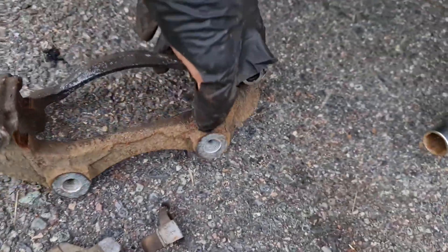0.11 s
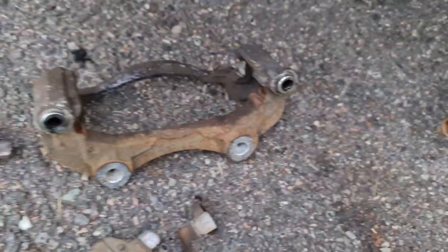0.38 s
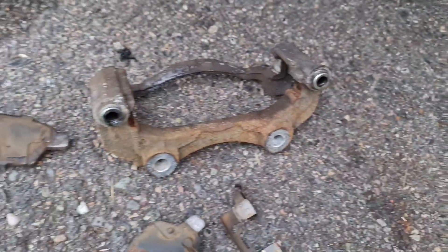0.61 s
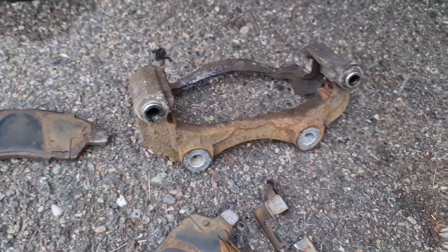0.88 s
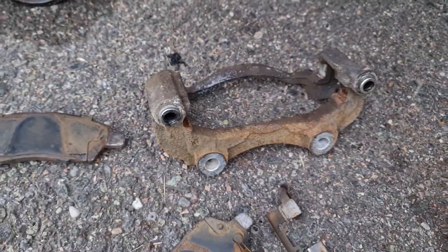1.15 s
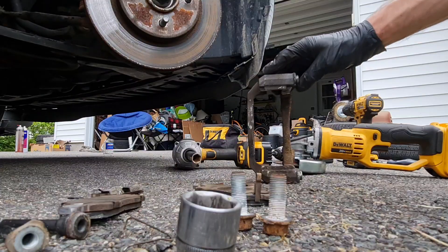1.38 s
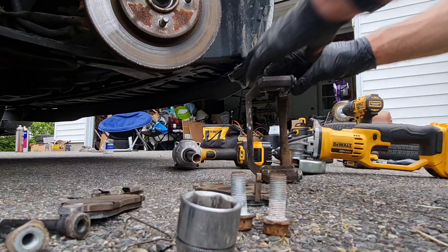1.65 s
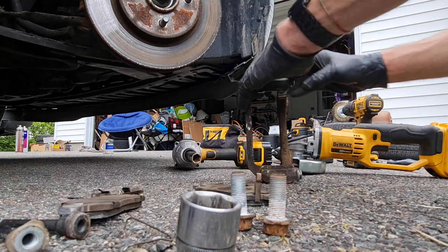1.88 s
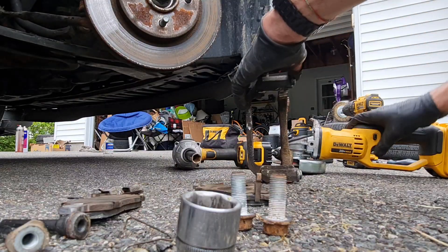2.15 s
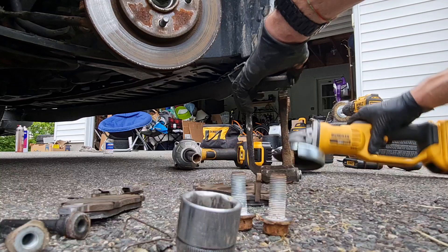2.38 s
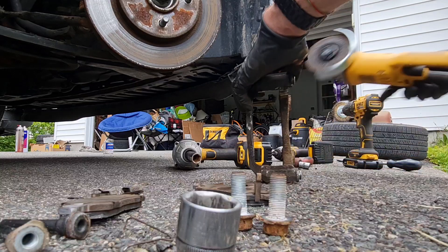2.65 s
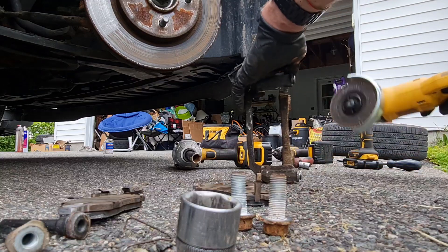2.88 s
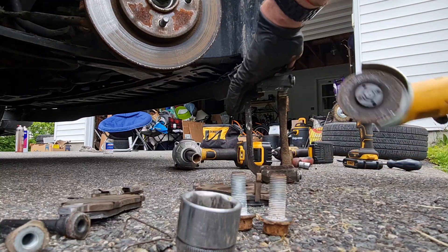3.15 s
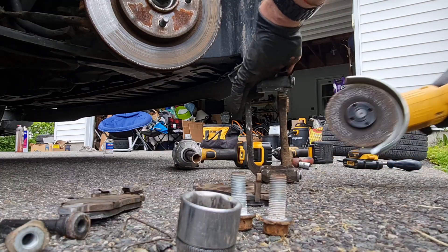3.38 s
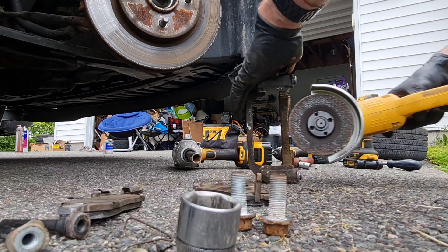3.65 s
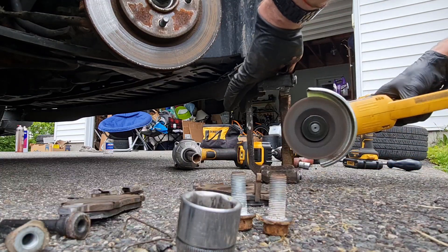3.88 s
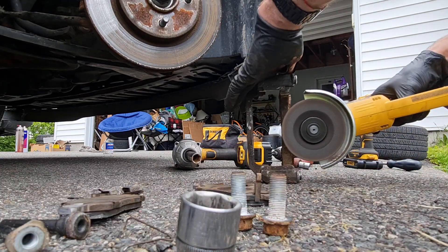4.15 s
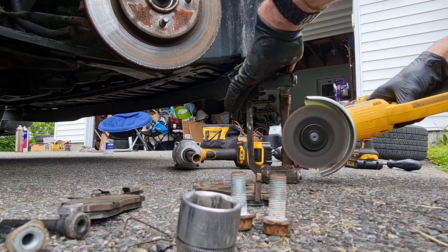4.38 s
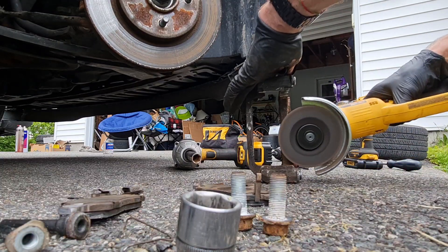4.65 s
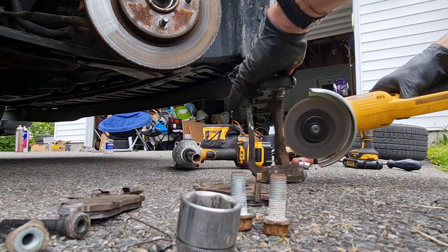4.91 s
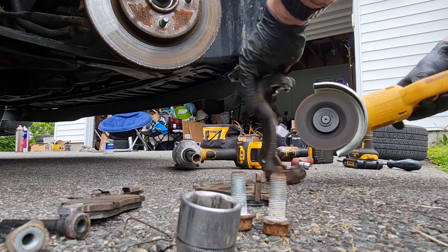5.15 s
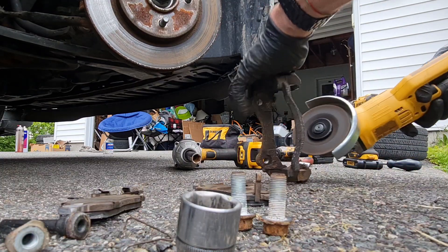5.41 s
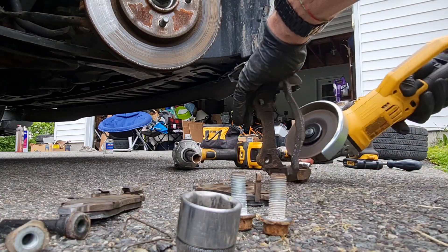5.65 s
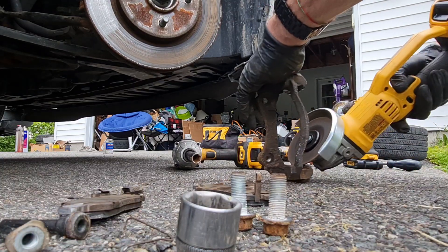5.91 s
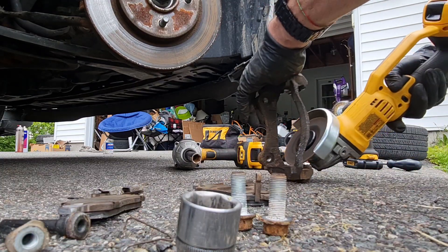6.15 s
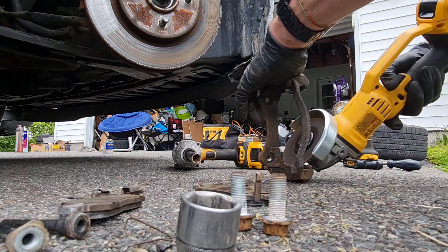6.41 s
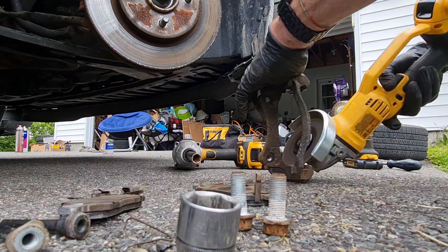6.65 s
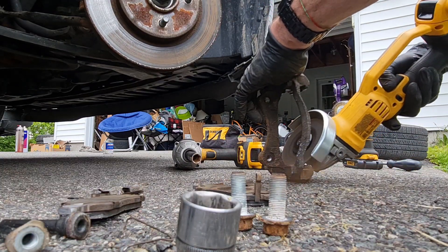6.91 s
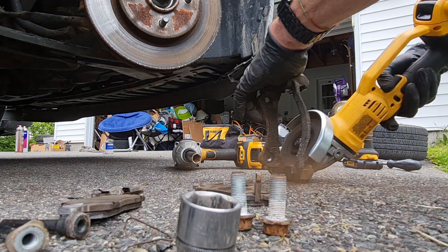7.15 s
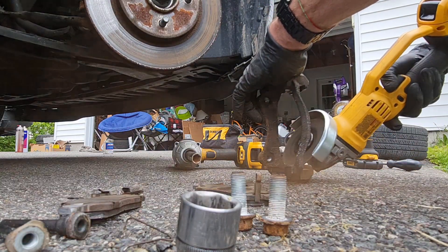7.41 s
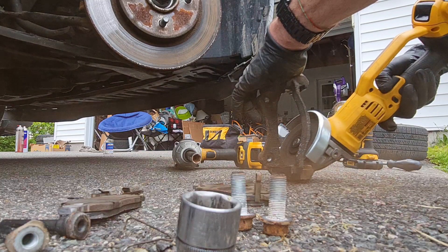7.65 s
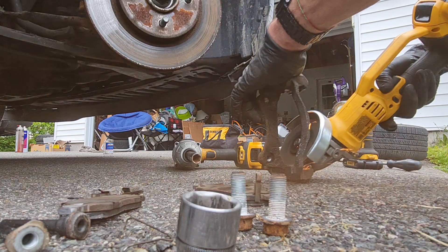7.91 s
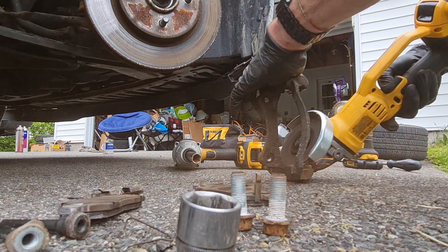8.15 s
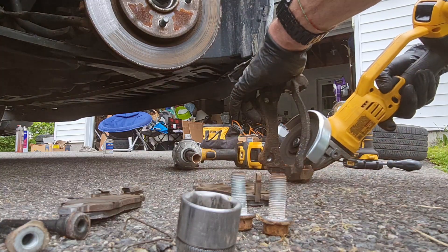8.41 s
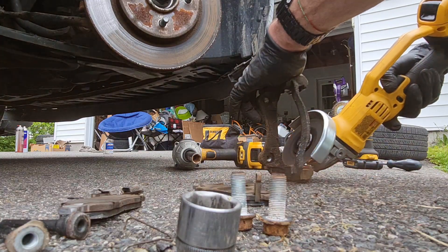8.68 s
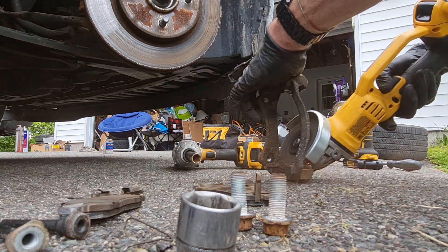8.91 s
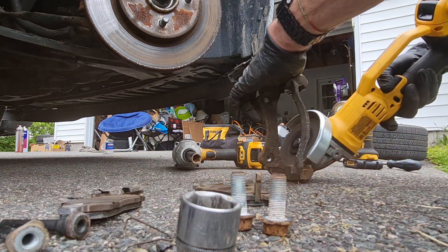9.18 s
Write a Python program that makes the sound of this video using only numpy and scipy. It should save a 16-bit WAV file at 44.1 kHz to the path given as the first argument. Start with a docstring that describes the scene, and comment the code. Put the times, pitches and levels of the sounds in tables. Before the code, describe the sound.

An iron casting clunks onto asphalt, gloves rustle and plastic knocks, then a cordless angle grinder whines up and rasps on rusty metal in strokes.

```python
"""A driveway beside a car: an iron brake bracket is laid down, gloves rub, everything goes silent for a moment,
and after more rustling and knocks a cordless angle grinder is switched on, turned and pressed on the rust.
The motor is tones tied to its shaft, housing noise and gear rattle; the wheel is noise that repeats each turn.
The bracket and the tool's shell are fading sine waves, and a far street is shaped noise.
Car and ground scatter the sound on its way to two microphone ports on the ground."""
import sys
import numpy as np
from scipy import signal
from scipy.fft import rfft, irfft, next_fast_len
from scipy.io import wavfile
from scipy.ndimage import uniform_filter1d

SR = 44100
rng = np.random.default_rng(int(sys.argv[2]) if len(sys.argv) > 2 else 0)


def voltage_ratio(decibels):
    """Convert decibels (scalar or array-like) to amplitude ratios, 20 dB per decade."""
    exponent = np.asarray(decibels, float) / 20
    return 10 ** exponent


def to_wav(sig):
    """Store sig (one row per channel, or 1-D mono) as 16-bit WAV at the path in sys.argv[1].

    Samples outside -1..1 are clipped; the rate is SR.
    """
    pcm = np.clip(np.atleast_2d(sig), -1, 1) * 32767
    pcm = np.round(pcm).astype(np.int16)
    wavfile.write(sys.argv[1], SR, pcm.T)  # frames by channels


N = 409688
T = np.arange(N) / SR  # time in seconds

# Moments in how the tool is held: spinning up, facing, turned, pressed on the bracket. Each entry: time in seconds.
POSE_TIMES = [4.05, 4.5, 5.7, 7.3]
# Motor noise before the tool's gain. Each row: time in seconds, housing level in dB, gear rattle above it in dB.
MOTOR_LEVELS = [(3.91, -26, 2.5), (3.96, -25.5, 10.5), (4.08, -27.5, 10.5), (4.2, -24.5, -1.5),
                (4.8, -22.5, -1.5), (5.4, -24.5, -0.5), (7.9, -25, -7)]
# Motor tones before the tool's gain: bearing cage, shaft, twice shaft, bearing balls, pinion teeth, fan, twice teeth.
# Each row: multiple of shaft speed, rough share from 0 to 1, level in dB facing, turned and pressed.
SHAFT_TONES = [(.863, 0.1, -50.5, -52, -57.5), (1, 0.06, -59, -42, -47.5), (2, 0.3, -42.5, -46, -54.5),
               (2.37, 0.48, -27.5, -27.5, -30.5), (9, .3, -60, -43.5, -47), (10, 0.6, -54, -27, -59),
               (18, 0.8, -48, -55, -54)]
# The same tones while spinning up. Each entry: level in dB.
SPIN_UP_TONES_DB = [-55, -47, -54, -37, -25, -48, -27]
# Gear case resonances. Each row: pitch in Hz, width in Hz, level in dB in each of the four poses and leaning hard.
GEAR_CASE = [(6030, 630, -0.5, -12, -9, -8.5, 1), (6850, 670, -0.49, -8.5, -3, 3, -2),
             (7140, 430, 2, -3.5, -12.5, -18.5, -1)]
# Colour of the housing noise while facing. Each row: frequency in Hz, relative level in dB.
FACING_COLOUR = [(120, -31), (300, -19), (550, -12.5), (800, -4.5), (1500, 1.5), (2100, 0), (2900, -1.5),
                 (4000, -5.5), (5100, -5), (8200, -19), (10300, -17.5), (15500, -21)]
# Colour of the housing noise once turned. Each row: frequency in Hz, relative level in dB.
TURNED_COLOUR = [(180, -30), (260, -10.5), (320, -20), (550, -9), (800, -2), (1100, 1), (1500, 0.5),
                 (2100, -4), (2900, 4.5), (3550, -2.5), (4150, 3.5), (5000, -3.5), (8200, -10.5),
                 (10300, -17.5), (12200, -12.5), (15500, -21)]

# Lumps on the wheel's rim that the bracket favours. Each row: multiple of wheel speed, relative level in dB.
RIM_LUMPS = [(14, -0.5), (15, -4), (20, -9), (24, -7.5), (34, -9.5), (49, -10.5), (52, -10.5), (53, -13.5),
             (55, -11), (56, -11), (59, -7.5)]
# Colour of the scrape on rust. Each row: frequency in Hz, relative level in dB.
RUST_COLOUR = [(300, -18), (800, -14), (1600, 7.5), (2100, 0), (2900, 1), (4100, 7), (5000, 5), (6200, 14),
               (8600, 7), (10300, 0.5), (12000, 7.5), (13000, -1.5), (14000, 3.5), (15500, -3)]
# Strokes that lean in and ease off. Each row: middle in seconds, half length in seconds, pressure in dB.
STROKE_TIMES = [(6.68, 0.028, -35), (7.0, 0.21, -32.5), (7.45, 0.27, -29), (7.841, 0.24, -29.5),
                (8.22, 0.31, -27.5), (8.66, 0.25, -29), (9.05, 0.054, -28.5)]
# The wheel hops off for a moment. Each row: middle in seconds, change of pressure in dB.
HOPS = [(7.495, -18), (7.89, -6.5), (9.103, -7)]
# The wheel snags and kicks the ground. Each row: time in seconds, bite in dB, thump level in dB, thump pitch in Hz.
SNAGS = [(7.674, 12, -30.5, 81), (8.514, 5.5, -45.5, 98), (8.877, 15.5, -30, 60), (9.138, 14, -34.5, 97.8),
         (9.168, 15, -33.5, 96.5)]

# Plastic knocks, switch clicks, and a low thump as the tool kicks the ground at 2.461 s. Each row: time in
# seconds, level in dB, pitch in Hz.
PLASTIC_KNOCKS = [(1.637, -52.5, 5570), (2.313, -43, 1380), (2.4317, -30, 1190), (2.442, -30, 2860),
                  (2.453, -26.5, 1390), (2.461, -39.5, 303), (2.542, -52, 1520), (2.961, -47.5, 4270),
                  (3.201, -39, 3170), (3.218, -43, 2000), (3.323, -50, 4160), (3.489, -56, 1000),
                  (3.848, -13.5, 2180), (3.899, -12, 1113)]
# Ways the tool's plastic shell rings. Each row: pitch in Hz, time to fall by 60 dB in seconds.
SHELL_MODES = [(872, .06), (1136, .055), (1362, .06), (1884, .045), (2800, .04), (3600, .03), (4400, .025)]
# Gloves and sleeves rubbing. Each row: middle in seconds, half length in seconds before stretching, level in dB.
RUBS = [(0.039, 0.19, -57.5), (0.244, 0.06, -47.5), (1.389, 0.1, -44.5), (1.826, 0.16, -61),
        (2.25, 0.14, -62.5), (2.821, 0.03, -48), (2.96, 0.066, -64.5), (3.126, 0.051, -62.5),
        (3.211, 0.02, -55)]
# Colour of the rubbing. Each row: frequency in Hz, relative level in dB.
GLOVE_COLOUR = [(500, -16.5), (900, -14), (1900, -6.5), (3200, -9), (6800, -11.5), (8600, -16.5),
                (10000, -27), (15000, -25)]

# Ways the iron casting rings. Each row: pitch in Hz, relative level in dB, time to fall by 60 dB in seconds.
BRACKET_MODES = [(1081, -1, 0.087), (1793, 2.5, 0.15), (1976, -4.5, 0.09), (2744, -12, 0.17),
                 (2910, -18, .15), (3690, -18.5, 0.17), (4240, -22.5, 0.25), (4829, -25.5, .25),
                 (4940, -22.5, .2), (5216, -33, 0.54), (5740, -27, 0.4), (6100, -22, 0.2),
                 (6858, -35.5, .29), (7200, -33, 0.24), (8200, -36, 0.22)]
# Touches as the bracket is laid down. Each row: time in seconds, ring level in dB, thud level in dB, thud pitch in Hz.
TOUCHES = [(0.023, -60.5, -47, 684), (0.197, -62, -46, 500), (.269, -28, -5.5, 550),
           (0.2752, -19, -12, 723), (0.3027, -19.5, -9.5, 704), (0.323, -28, -17.5, 560)]
# The two ringing modes left free while the bracket is dragged in the hand. Each entry: row in the bracket table.
DRAG_MODES = [3, 7]
# The casting rocks on the grit before it lies still: start in seconds, end in seconds.
ROCKING_S = (.275, .345)

# Colour of the far traffic. Each row: frequency in Hz, relative level in dB.
STREET_COLOUR = [(25, -11.5), (110, 3.5), (230, -9.5), (430, -14), (900, -19), (2500, -26.5), (8000, -43.5),
                 (12000, -78)]
# A low early hum. Each row: time in seconds, pitch in Hz, level in dB.
HUM_PATH = [(0, 55.7, -54), (.25, 56.5, -46.5), (.34, 56.5, -34.5), (.68, 52.9, -37.5), (.85, 53.2, -49.5),
            (1.15, 52, -56.5)]
# A faint steady whistle. Each row: start in seconds, end in seconds, pitch in Hz, level in dB.
WHISTLE = [(.62, .95, 478, -69)]

# How the two ports hear the tool. Each row: frequency in Hz, radians the left port leads, left minus right in dB,
# share from 0 to 1 that differs between the ports.
PORT_HEARING = [(60, -2, 2.5, 0.23), (199, -0.2, -2.5, 0.44), (550, 2, -10.5, 0.59), (966, -1.6, -1, 0),
                (2000, -2.5, -3.5, 0.78), (2940, -2.5, -8.5, 0.36), (4135, -2, -0.5, 0.32),
                (6900, -6.5, -6.5, 0.77), (8160, -3.5, 2, 0.83), (14350, -12, 0, 1)]
# The short silence of the whole scene: start in seconds, end in seconds.
SILENCE_S = (1.155, 1.218)

GEAR = 9 / 32  # wheel turns per motor turn
SHARED = np.array([[1], [0], [0]])  # puts a sound in the part both ports hear
SWITCH_S, SPIN_UP_S, FREE_HZ = 3.9, 0.105, 408  # free speed in shaft turns per second
CONTACT_S, LOAD_HZ, LOAD_S, SAG_HZ_PER_S = 6.62, 3.5, 0.3, 1.3  # the wheel meets the rust
TURN_S, LEANING_S = 5.29, 8.94
TOOL_DB, SCRAPE_DB = 4, -4  # gain of motor and wheel together; scrape relative to the rim lumps
RESTING_DB, HOP_HALF_S = -32, 0.032
SHELL_DB_PER_OCTAVE = -2  # a knock favours shell modes near its own pitch
ROCKING_DB, DRAG_S, DRAG_DB = -52, 0.12, -59
ECHO_DB, STREET_DB = -9, -57.5


def motor(shaft, turns):
    """Housing noise changes colour as the tool is turned, gears rattle, and tones follow the shaft speed."""
    housing_db, rattle_db = curves(MOTOR_LEVELS)
    turned = np.clip((T - TURN_S) / 0.32 + 0.5, 0, 1)
    air = trio() + 0.39 * SHARED * repeating(turns, 0.888)
    air = air * beats(turns, 1.5, 1.4, 2.7)
    facing_noise = colour(air, FACING_COLOUR, 500, 2480)
    turned_noise = colour(air, TURNED_COLOUR, 440, 3000)
    housing = (1 - turned) * facing_noise + turned * turned_noise

    # teeth stay loaded while the motor gains speed, then slap once a wheel turn
    loose = (shaft / shaft.max()) ** 4
    backlash = trio() + 0.9 * SHARED * repeating(turns, 0.863)
    backlash = backlash * beats(turns, 18.5, 5.1, 2.7) ** loose * voltage_ratio(1.2 * walk(25))
    rattle = np.zeros((3, N))
    for hz, width, *pose_db in GEAR_CASE:
        level_db = np.interp(T, [*POSE_TIMES, LEANING_S], pose_db)
        rattle += voltage_ratio(level_db) * unit(band(backlash, hz, width))
    rattle = unit(rattle)

    # the bracket and hands screen the tool once it is pressed in
    housing_db = housing_db - 2.8 * np.clip((T - 6.7) / 1.7, 0, 1)
    out = voltage_ratio(housing_db) * housing + voltage_ratio(housing_db + rattle_db) * rattle
    for (multiple, rough, *pose_db), start_db in zip(SHAFT_TONES, SPIN_UP_TONES_DB):
        level_db = np.interp(T, POSE_TIMES, [start_db, *pose_db])
        flutter = 1 - rough + rough * walk(90)
        out[0] += tone(multiple * shaft, level_db) * flutter * shaft / shaft.max()
    return out * np.clip((T - 3.905) / 0.013, 0, 1)


def speed():
    """Motor shaft turns per second: gains speed like a flywheel, drops on the rust, then sags with the battery."""
    running = np.maximum(T - SWITCH_S, 0)
    loaded = np.maximum(T - CONTACT_S, 0)
    free = FREE_HZ * (1 - np.exp(-running / SPIN_UP_S))
    drop = LOAD_HZ * (1 - np.exp(-loaded / LOAD_S))
    return free - drop - SAG_HZ_PER_S * loaded


def wheel(shaft, turns):
    """The rim's grit repeats every turn and wears slowly; its lumps hum, and loose rust hisses and snags."""
    grit = repeating(turns, 0.92)
    lumps = sum(tone(k * GEAR * shaft, db + 2.2 * walk(20)) for k, db in RIM_LUMPS)
    snag_db = 2.0 * np.cos(4 * np.pi * turns) + 0.97 * np.cos(6 * np.pi * turns) + 2.0 * walk(70)
    rubbing = (0.58 + 0.48 * SHARED) * grit + 0.73 * trio()
    rubbing = rubbing * voltage_ratio(snag_db) * beats(turns, 3.4, 2.1, 2.3)
    scrape = colour(rubbing, RUST_COLOUR, 9100, 15500)
    return pressure() * (voltage_ratio(SCRAPE_DB) * scrape + lumps * SHARED)


def pressure():
    """How hard the wheel works: a light rest plus strokes, made stronger by snags and weaker by hops."""
    lean = voltage_ratio(RESTING_DB) + sum(voltage_ratio(db) * hump(s, half) for s, half, db in STROKE_TIMES)
    # each bite peaks 4 ms after its snag starts
    bite_db = sum(db * np.exp(-((T - s - 0.004) / 0.0054) ** 2) for s, db, *_ in SNAGS)
    hop_db = sum(db * hump(s, HOP_HALF_S) for s, db in HOPS)
    return lean * voltage_ratio(bite_db + hop_db) * np.clip((T - CONTACT_S) / 0.03, 0, 1)


def bracket():
    """Each touch is a dull thud on asphalt and a ring of the casting; the blow takes a moment to build."""
    drag = sum(unit(band(noise(), BRACKET_MODES[k][0], 37)) for k in DRAG_MODES)
    out = voltage_ratio(DRAG_DB) * np.clip(1 - (T / DRAG_S) ** 4, 0, 1) * drag
    build = 1 - np.exp(-np.arange(22050) / SR / 0.00044)
    for s, ring_db, thud_db, hz in TOUCHES:
        casting = 0
        for mode_hz, mode_db, t60 in BRACKET_MODES:
            chance_db = 2.5 * rng.standard_normal()
            casting = casting + voltage_ratio(ring_db + mode_db + chance_db) * ring(mode_hz, t60)
        thud = ring(hz, 0.043) + 1.4 * ring(2.1 * hz, 0.0083) + 0.28 * ring(0.65 * hz, 0.04)
        add(out, s, build * casting)
        add(out, s, build * voltage_ratio(thud_db) * thud)

    # grit noise sets the whole casting ringing
    start, end = ROCKING_S
    grit = noise()[:int((end - start) * SR)]
    casting = sum(voltage_ratio(db) * ring(hz, t60) for hz, db, t60 in BRACKET_MODES)
    add(out, start, voltage_ratio(ROCKING_DB) * signal.fftconvolve(grit, casting))
    return out


def handling():
    """Knocks are noise bursts ringing the plastic shell; low thumps cross the ground, and gloves rub."""
    out = np.zeros((3, N))
    age = np.arange(8000) / SR
    fall = 1000. ** (-age / 0.057) + 0.089 * 1000. ** (-age / 0.23)
    fall = fall * (1 - np.exp(-age / 0.00054))
    for s, db, hz in PLASTIC_KNOCKS:
        crack = rng.standard_normal((3, 8000))
        # a harder blow cracks brighter
        body = 0.75 * unit(band(crack, hz, hz / 3)) + voltage_ratio(0.59 * db - 3.5) * np.gradient(crack, axis=1)
        shell = 0
        for mode_hz, t60 in SHELL_MODES:
            mode_db = SHELL_DB_PER_OCTAVE * abs(np.log2(mode_hz / hz)) + 3 * rng.standard_normal()
            shell = shell + voltage_ratio(mode_db) * ring(mode_hz, t60, size=8000)
        knock = fall * body + 0.47 * band(shell, hz, 2 * hz)
        add(out.T, s, voltage_ratio(db) * knock.T)
    for s, _, db, hz in SNAGS:
        add(out[0], s, voltage_ratio(db) * ring(hz, 0.094))

    rub = voltage_ratio(-70.5) * (T < 3.9)  # faint rubbing throughout the first part
    for s, half, db in RUBS:
        rub = rub + voltage_ratio(db) * hump(s, 1.37 * half)
    return out + rub * colour(trio() * voltage_ratio(2.4 * walk(250)), GLOVE_COLOUR, 1700, 9000)


def street():
    """Far traffic is shaped noise, alike at both ports in the bass; a low hum and a whistle come early on."""
    middle = colour(noise() * voltage_ratio(1.1 * walk(2.0)), STREET_COLOUR)
    side = colour(colour(noise(), STREET_COLOUR), [(40, -33.5), (300, 1.0), (1500, 6.0)])
    far = voltage_ratio(STREET_DB) * (middle + 0.6 * side * np.array([[1], [-1]]))
    whistle = 0
    for start, end, hz, db in WHISTLE:
        fade = np.clip(np.minimum(T - start, end - T) / 0.015, 0, 1)
        whistle = whistle + tone(np.full(N, hz), db) * fade
    hum = tone(*curves(HUM_PATH)) * (T < SILENCE_S[1])
    return (far + whistle + hum) * voltage_ratio(np.array([[-1.1], [0.9]]))


def ports(x):
    """Shared sound reaches the ports with lag and shading; each also hears its own scatter off car and ground."""
    size = next_fast_len(N + 4096)
    lead, pan_db, own = along(PORT_HEARING, size)
    own = np.clip(own, 0, 1)
    side = np.array([[0.5], [-0.5]])
    parts = rfft(x, size)
    shared = np.sqrt(1 - own) * np.exp(1j * side * lead) * parts[0]
    heard = shared + np.sqrt(own) * parts[1:]
    # the car's underside adds a short echo that colours each port, growing in from 2 to 4 kHz
    tails = rng.standard_normal((2, 2000)) * 1000. ** (-np.arange(2000) / SR / 0.059)
    treble = np.clip(np.arange(len(own)) * SR / size / 2000 - 1, 0, 1)
    echo = 1 + voltage_ratio(ECHO_DB) * rfft(tails / np.linalg.norm(tails[0]), size) * treble
    return irfft(voltage_ratio(side * pan_db) * heard * echo, size)[:, :N]


def repeating(turns, memory, size=400):
    """Noise that comes round again every wheel turn and wears slowly."""
    fresh = rng.standard_normal((int(turns[-1]) + 1, size))
    worn = signal.lfilter([1], [1, -memory], fresh, axis=0)
    return unit(worn.ravel()[(turns * size).astype(int)])


def beats(turns, depth_db, alternate_db, scatter_db):
    """A swell once a wheel turn, strong then weak, each of its own size."""
    count = int(turns[-1]) + 2
    size_db = scatter_db * rng.uniform(-2.58, 1, count) + alternate_db * (-1.) ** np.arange(count)
    swell = np.exp(-(turns % 1) / 0.51)
    return voltage_ratio(swell * (depth_db + size_db[turns.astype(int)]))


def tone(hz, db):
    """A sine wave that follows a changing pitch, with its rms level in dB."""
    return voltage_ratio(db) * np.sqrt(2) * np.sin(2 * np.pi * np.cumsum(hz) / SR)


def ring(hz, t60, size=22050):
    """A sine wave that falls by 60 dB in t60 seconds."""
    t = np.arange(size) / SR
    return np.sin(2 * np.pi * hz * t) * 1000. ** (-t / t60)


def band(x, hz, width):
    """A resonance applied twice, for steep flanks."""
    b, a = signal.iirpeak(hz, hz / width, SR)
    return signal.lfilter(np.convolve(b, b), np.convolve(a, a), x)


def colour(x, spectrum, lo_hz=20, hi_hz=16000):
    """Shapes x by a spectrum, with rms 1 between the two frequencies."""
    size = next_fast_len(N)
    shaped = rfft(x, size) * voltage_ratio(along(spectrum, size)[0])
    inside = shaped[..., int(lo_hz * size / SR):int(hi_hz * size / SR)]
    power = np.sum(abs(inside) ** 2, axis=-1, keepdims=True)
    return irfft(shaped, size)[..., :N] * np.sqrt(size * N / 2 / power)


def noise():
    """White noise for one channel."""
    return rng.standard_normal(N)


def trio():
    """Noise heard at both ports, at the left only and at the right only."""
    return rng.standard_normal((3, N))


def walk(rate):
    """Random levels held for 1 / rate seconds, with smoothed steps; rms 1."""
    hold = int(SR / rate)
    steps = np.repeat(rng.standard_normal(N // hold + 1), hold)
    return unit(uniform_filter1d(steps, hold)[:N])


def hump(s, half):
    """A smooth rise and fall around s."""
    return np.cos(np.pi / 2 * np.clip((T - s) / half, -1, 1)) ** 2


def unit(x):
    """Scales x to rms 1."""
    return x / np.sqrt(np.mean(x ** 2))


def curves(table):
    """Columns of a table as signals in time."""
    s, *columns = np.transpose(table)
    return [np.interp(T, s, column) for column in columns]


def along(table, size):
    """Columns of a table over the frequencies of a transform, joined evenly in pitch."""
    hz, *columns = np.transpose(table)
    bins_hz = np.arange(size // 2 + 1) * SR / size
    return [np.interp(np.log(bins_hz + 1), np.log(hz), column) for column in columns]


def add(out, s, sound):
    """Mixes a sound into out from s seconds on."""
    i = int(s * SR)
    out[i:i + len(sound)] += sound[:N - i]


def scene():
    """Tool and handling pass to the ports; bracket and street join them, and all goes silent for a moment."""
    shaft = speed()
    turns = np.cumsum(GEAR * shaft) / SR
    tool = voltage_ratio(TOOL_DB) * (motor(shaft, turns) + wheel(shaft, turns))
    casting = bracket() * voltage_ratio(np.array([[-1.5], [0.8]]))
    start, end = SILENCE_S
    gap = np.clip(np.maximum(start - T, T - end) / 0.0094, 0, 1)
    return (ports(tool + handling()) + casting + street()) * gap


def band_limit(x):
    """A steep low-pass at the top of the band."""
    return signal.sosfilt(signal.butter(12, 15830, fs=SR, output="sos"), x)


def record(dry):
    """Peaks flatten at full scale."""
    mix = np.clip(dry, -1, 1)
    return band_limit(mix)


dry = scene()
out = record(dry)
to_wav(out)
```